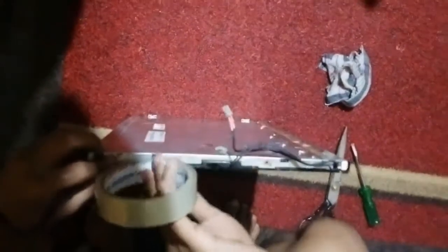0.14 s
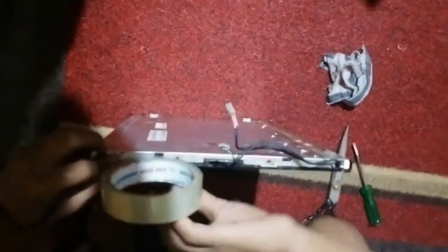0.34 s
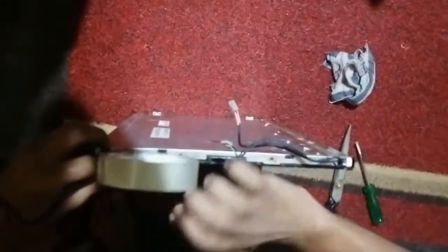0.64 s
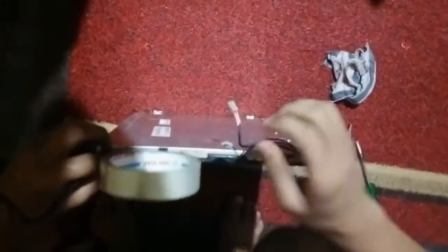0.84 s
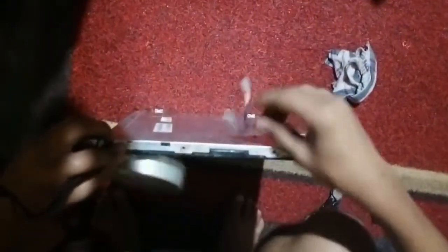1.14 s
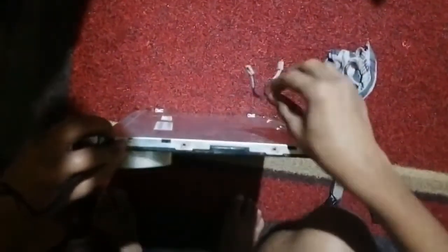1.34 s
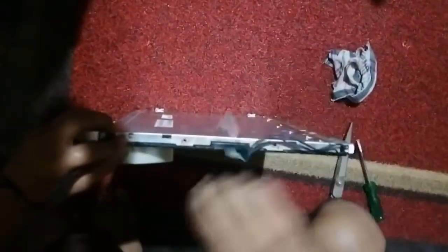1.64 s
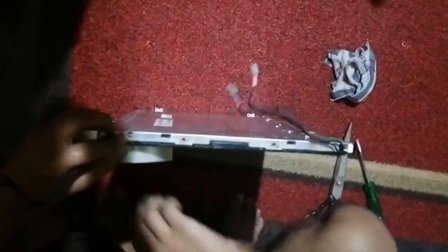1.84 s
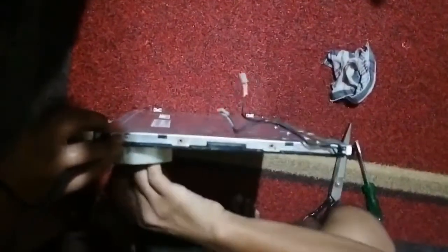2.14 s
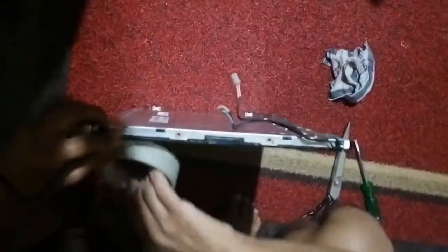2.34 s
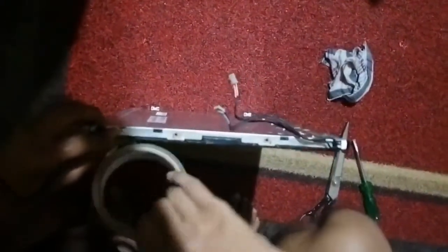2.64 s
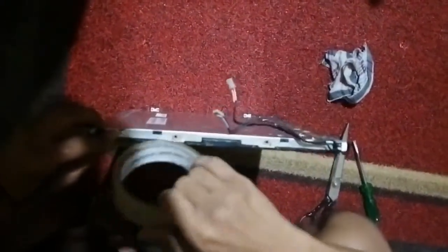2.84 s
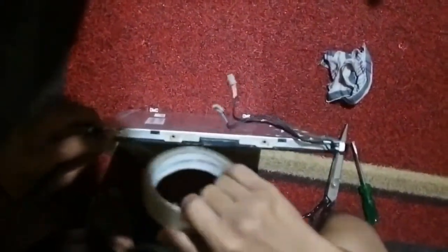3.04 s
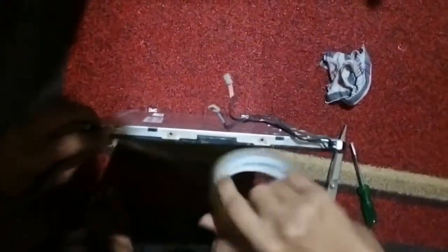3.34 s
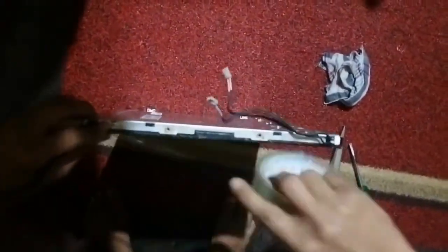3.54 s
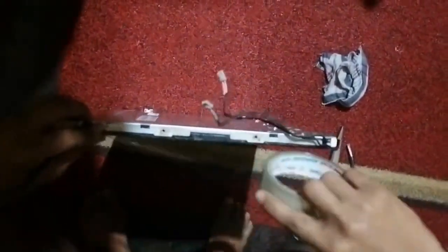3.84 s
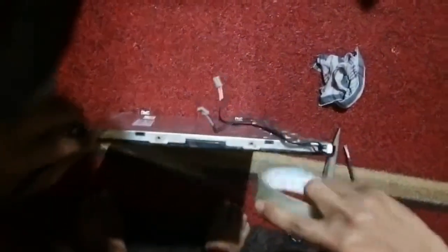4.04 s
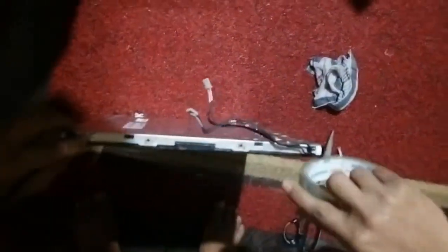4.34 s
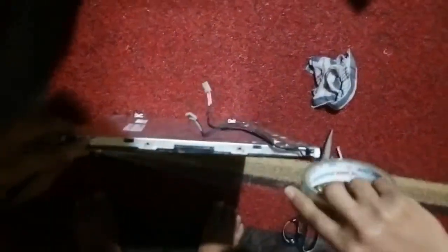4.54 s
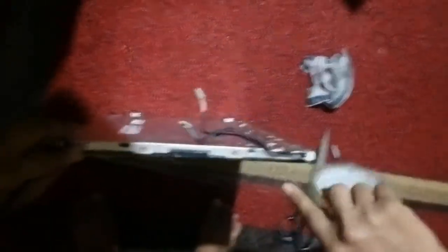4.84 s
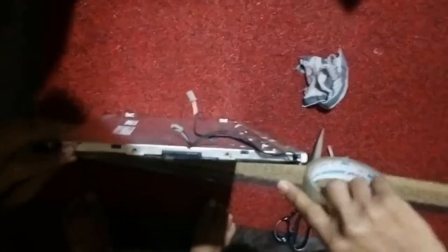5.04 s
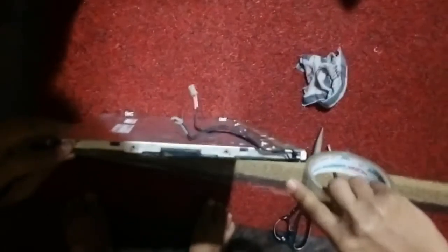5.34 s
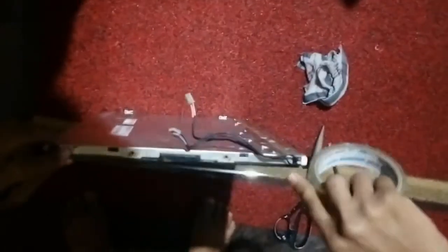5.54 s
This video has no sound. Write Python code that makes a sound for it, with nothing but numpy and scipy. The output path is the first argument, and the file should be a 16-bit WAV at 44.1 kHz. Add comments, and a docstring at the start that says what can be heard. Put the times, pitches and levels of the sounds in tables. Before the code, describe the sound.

Fingers pick at and crinkle a roll of adhesive tape, then pull it out in short rasps along a faintly ringing metal panel.

```python
"""A dull pop sounds over faint hiss in a small room; fingers crinkle a roll of adhesive tape and pick
at its end, then pull it along the metal edge of a panel in short rasps. Each rasp is stick-slip
friction: at every jerk the film snaps, the glue crackles and the roll and taut strip resonate; the
panel rings on. Slower slips snap higher and louder; as the free strip grows, its hum sinks and fades."""
import sys
import numpy as np
from scipy import signal
from scipy.fft import rfft, irfft
from scipy.io import wavfile
from scipy.ndimage import map_coordinates

SR = 44100
rng = np.random.default_rng(int(sys.argv[2]) if len(sys.argv) > 2 else 0)


def bounce(signal):
    """Save signal as a 16-bit WAV file at the path given by the first command-line argument."""
    frames = np.transpose(np.atleast_2d(signal))
    limited = np.clip(frames, -1, 1)
    pcm = np.round(limited * 32767).astype(np.int16)
    wavfile.write(sys.argv[1], SR, pcm)


N = 251370

# Runs of stick-slip:
# first_slip_s, last_slip_s, start_rate_hz, end_rate_hz, snap_db, glue_db, free_strip_m, panel_db
PULLS = [(3.4895, 3.5685, 314, 160.5, -1, -18, 0.19, -21), (3.6308, 3.6919, 295, 293, -2, -18.5, .27, -20),
         (3.8086, 3.8223, 195, 208, 2.5, -16.5, .29, -13.5), (4.2107, 4.301, 126, 200, 1.5, -17, .35, -25),
         (4.3139, 4.3360, 135, 133, 1, -23, 0.41, -20.5), (4.9532, 4.9914, 53.2, 44.7, -3, -18, 0.34, -33)]
USUAL_RATE_HZ, SHORT_STRIP_M = 200, 0.17  # reference slip rate and free length


def amp(db):
    """Decibels to amplitude ratio."""
    return 10 ** (np.asarray(db) / 20)


def unit(x):
    """Normalisation to rms 1."""
    return x / np.sqrt(np.mean(x ** 2) + 1e-20)


def along(points, hz):
    """Interpolation of (frequency_hz, value) points on a logarithmic frequency axis."""
    frequencies, values = np.transpose(points)
    return np.interp(np.log(hz + 1e-6), np.log(frequencies), values)


def seconds(size):
    """Sample times."""
    return np.arange(size) / SR


def add(track, start_s, x):
    """Superposition of x on the track."""
    i = max(round(start_s * SR), 0)
    track[i:i + len(x)] += x[:len(track) - i]


def through(x, response):
    """Linear filtering by convolution with an impulse response."""
    return signal.fftconvolve(x, response)[:len(x)]


def impulse(db_of_hz, size=2048):
    """The minimum-phase impulse response of a spectrum, with energy 1."""
    cepstrum = irfft(np.log(amp(db_of_hz(np.fft.rfftfreq(size, 1 / SR))) + 1e-6))
    cepstrum[1:size // 2] *= 2
    cepstrum[size // 2 + 1:] = 0
    response = irfft(np.exp(rfft(cepstrum)))
    return response / np.linalg.norm(response)


def resonance(hz, centre_hz, q):
    """Gain in dB of a second-order resonator."""
    return -10 * np.log10(1 + (q * (hz / centre_hz - centre_hz / (hz + 1e-6))) ** 2)


def grit(size, spread_db):
    """Fracture noise of rms 1: tiny impulses with a log-normal spread of size."""
    return unit(rng.standard_normal(size) * amp(spread_db * rng.standard_normal(size)))


def hiss(spectrum):
    """Stationary noise of rms 1 with the given spectral shape."""
    gain = amp(along(spectrum, np.fft.rfftfreq(N, 1 / SR)))
    return unit(irfft(rfft(rng.standard_normal(N)) * gain, N))


def background(settle_s=0.7):
    """The noise floor of room and microphone: its colour drifts at first, its level sinks late on."""
    # Spectra of the low hiss and of the early and settled treble: frequency_hz, density_db
    low_spectrum = [(12, -68), (20, -29.5), (27, -33.5), (40, -11.5), (52, -1.5), (96, -9), (123, -4),
                    (319, -5), (369, -5), (582, -3.5), (1850, -4), (2800, -4.5), (3640, -33), (6160, -120)]
    early_spectrum = [(1760, -40), (3000, -17), (3450, 0), (3550, -19), (4030, 0), (4440, 1), (6350, -19),
                      (7200, -13), (8230, -26.5), (14100, -29), (16000, -43)]
    settled_spectrum = [(1760, -43), (3000, -3), (3310, 6.5), (3480, -4), (3570, -3), (4050, 4.5),
                        (5520, -8.5), (6170, -19), (7350, 0), (7670, -9.5), (8170, -19.5), (9460, -17),
                        (10700, -20.5), (15100, -28), (16000, -42)]
    # Drift of the noise floor: time_s, gain_db
    drift = [(0, -2.5), (3.3, 1), (5.7, -8)]
    gain = amp(np.interp(seconds(N), *np.transpose(drift)))
    settled = np.clip(seconds(N) / settle_s, 0, 1) ** 2
    sizzle = np.sqrt(1 - settled) * hiss(early_spectrum) + np.sqrt(settled) * hiss(settled_spectrum)
    return gain * (amp(-63.5) * hiss(low_spectrum) + amp(-61) * sizzle)


def room(x, build_s=0.00033, gap_s=0.00067, hold_s=0.02, echo_s=0.0251, echo_width_s=0.0025):
    """Reverberation: dense reflections hold for one crossing, swell with the far wall's echo and die."""
    # Reverberation time: frequency_hz, t60_s
    decay_times = [(120, 0.49), (500, 0.27), (1500, 0.25), (3000, 0.25), (7000, 0.24), (14000, 0.18)]
    # Colour of the reflections: frequency_hz, gain_db
    colour = [(60, -23.5), (160, -2), (260, 2), (400, 2.5), (600, 0.5), (740, -2), (1000, -3.5),
              (2000, 3.5), (3200, 5.5), (4300, -3), (7500, 6.5), (14000, 0.5)]
    hz, frame_s, noise = signal.stft(rng.standard_normal(32768), SR, nperseg=256)
    decay = amp(-60 * np.maximum(frame_s - hold_s, 0) / along(decay_times, hz)[:, None])
    tail = signal.istft(noise * decay, SR, nperseg=256)[1]
    t = seconds(len(tail))
    tail *= 1 - np.exp(-np.maximum(t - gap_s, 0) / build_s)
    tail *= 1 + amp(-0.5) * np.exp(-((t - echo_s) / echo_width_s) ** 2)
    tail = through(tail, impulse(lambda hz: along(colour, hz)))
    return through(x, tail / np.linalg.norm(tail))


def pop(time_s=.2247, swell_s=0.022):
    """A brief faint swell of noise leads into a dull, dry pop: a filtered impulse with little treble."""
    # Spectrum of the pop: frequency_hz, gain_db
    spectrum = [(200, -34), (500, -25.5), (900, -17.5), (1900, -20.0), (2800, -36.5), (6000, -58)]
    out = np.zeros(N)
    rise = np.linspace(.2, 1, round(swell_s * SR))
    add(out, time_s - swell_s, amp(-47) * rise * rng.standard_normal(len(rise)))
    add(out, time_s, amp([-16.5]))
    return through(out, impulse(lambda hz: along(spectrum, hz)))


def bumps():
    """Soft handling excites low, damped resonances with swells of noise."""
    # Knocks and creaks: start_s, length_s, level_db, pitch_hz
    knocks = [(1.364, 0.034, -54.5, 264), (1.374, 0.022, -48, 770), (3.9, 0.16, -57, 302.7),
              (5.326, 0.079, -65, 179.8)]
    out = np.zeros(N)
    for start_s, length_s, level_db, pitch_hz in knocks:
        swell = np.hanning(round(length_s * SR))
        body = impulse(lambda hz: 2 * resonance(hz, pitch_hz, q=3))
        add(out, start_s, amp(level_db) * signal.fftconvolve(swell * rng.standard_normal(len(swell)), body))
    return out


def fidgets(rate_hz=7, length_s=0.039, pitch_hz=3600):
    """Fingers rustle the film at jittered intervals; returns rows for crinkles()."""
    # Spells of shifting the grip: start_s, end_s, level_db
    spells = [(2.333, 2.703, -60.5), (3.3, 3.467, -64), (4.619, 5.302, -65)]
    rows = []
    for start_s, end_s, level_db in spells:
        count = max(round((end_s - start_s) * rate_hz), 1)
        for k, (jitter, size, colour) in enumerate(2 * rng.random((count, 3)) - 1):
            onset_s = start_s + (end_s - start_s) * (k + (1 + jitter) / 4) / count
            rows.append((onset_s, length_s, level_db + 2 * size, pitch_hz * 2 ** (colour / 2)))
    return rows


def crinkles(grains_per_s=300, grain_decay=2.4):
    """Sticky film lifts and creases, releasing energy in clumps of unevenly spaced transients."""
    # Creases of the film: start_s, length_s, level_db, pitch_hz
    creases = [(1.2, 0.044, -54, 1900), (1.281, 0.016, -41, 3500), (1.297, 0.018, -27.5, 3780),
               (1.323, 0.03, -44.5, 2700), (2.149, 0.042, -49.5, 5300), (2.519, 0.016, -48, 2820),
               (2.699, 0.021, -49.5, 2650), (5.509, 0.047, -63, 3990)]
    # Radiation of the film: frequency_hz, gain_db
    spectrum = [(200, 7), (1000, 6), (3500, 6), (6300, 6.5), (7600, 5), (8300, -3), (12000, 9.5),
                (16000, -8.5)]
    out = np.zeros(N)
    for start_s, length_s, level_db, pitch_hz in creases + fidgets():
        t = seconds(round(length_s * SR))
        grain_times = np.cumsum(rng.uniform(.3, 1.7, 64)) / grains_per_s
        grain_phase = np.mod(np.interp(t, grain_times, np.arange(len(grain_times))), 1)
        swell = np.sin(np.pi * (t + .003) / (length_s + .006))
        clump = unit(grit(len(t), spread_db=0) * np.exp(-grain_decay * grain_phase) * swell)
        film = impulse(lambda hz: along(spectrum, hz) + resonance(hz, pitch_hz, q=1.51))
        add(out, start_s, amp(level_db) * signal.fftconvolve(clump, film))
    return out


def ticks(t60_s=.011):
    """Impulsive excitation: a nail catches the tape's edge, and a broad resonance colours the burst."""
    # Catches of the nail: start_s, level_db, pitch_hz
    catches = [(0.317, -53, 4400), (1.176, -28.5, 3100), (1.816, -41.5, 5100), (2.143, -46, 5160),
               (2.436, -41, 3270), (2.521, -51, 3300), (2.633, -38.5, 6560), (2.771, -34, 3300),
               (2.917, -41.5, 3000), (2.977, -23.5, 1920), (3.134, -45, 3580), (3.284, -32.5, 1330),
               (3.37, -37.5, 2230)]
    # Spectrum of the contact: frequency_hz, gain_db
    spectrum = [(150, -18), (800, -1.5), (1800, -1), (3200, -1.5), (7000, 0.5), (12000, -0.5),
                (16000, -11.5)]
    out, t = np.zeros(N), seconds(2048)
    for start_s, level_db, pitch_hz in catches:
        contact = impulse(lambda hz: along(spectrum, hz) + resonance(hz, pitch_hz, q=1.2))
        burst = through(grit(len(t), spread_db=8.5) * amp(-60 * t / t60_s), contact)
        add(out, start_s, amp(level_db + 16.5) * burst / np.linalg.norm(burst))
    return out


def roll(jerks):
    """Damped modes make the cardboard roll sound hollow; the wider a mode, the faster it decays."""
    # Modes of the roll: frequency_hz, bandwidth_hz, level_db
    modes = [(600, 300, 6), (1082, 55, -1.5), (1432, 33, -0.5), (1880, 430, -1), (3200, 31, -19),
             (3580, 37, -3), (3910, 360, 5.5)]
    t = seconds(8192)
    ring = sum(amp(db) * np.sqrt(width) * np.exp(-np.pi * width * t) * np.sin(2 * np.pi * hz * t)
               for hz, width, db in modes)
    return through(jerks, ring / np.linalg.norm(ring))


def panel(pitch_hz, t60_s=1.9):
    """Free vibration of thin metal after a tug: a few clear modes among many close ones, energy 1."""
    # Clear modes of the panel: frequency_hz, level_db
    modes = [(872.1, -71.5), (1157, -75), (1340, -82.5), (1556, -78), (1685, -77), (1739, -93),
             (2024, -72.5), (2121, -72.5), (2191, -76), (2266, -73.5), (2320, -74), (2369, -80),
             (2449, -76), (2676, -83.5), (2864, -85.5), (2982, -77.5), (3074, -87.5), (3160, -78)]
    # Radiation of its close modes: frequency_hz, gain_db
    spectrum = [(150, -45), (500, -6.5), (850, 1.5), (2400, -2), (2750, -14.5), (3200, 0), (3600, -14),
                (6000, -20.5), (9000, -52)]
    t = seconds(65536)
    clear = unit(sum(amp(db) * np.sin(2 * np.pi * hz * t + rng.uniform(0, 2 * np.pi)) for hz, db in modes))
    wash = unit(through(rng.standard_normal(len(t)), impulse(lambda hz: along(spectrum, hz))))
    emphasis = impulse(lambda hz: resonance(hz, pitch_hz, q=.7))
    ring = through(.5 * clear + wash, emphasis) * amp(-60 * t / t60_s)
    return ring / np.linalg.norm(ring)


def strip(wave_m_per_s=107, feed_m_per_s=.6, rise_s=0.0042, t60_s=0.14, flutter_db=6.5, waver=0.094):
    """The taut strip hums as a string, f = c / 2L: lower and weaker when long, louder for fast slips."""
    out, t = np.zeros(N), seconds(16384)
    for first_s, last_s, rate_hz, *_, free_m, _ in PULLS:
        pull_s = last_s - first_s
        length_m = free_m + feed_m_per_s * np.minimum(t, pull_s)
        flutter, bend = (map_coordinates(rng.standard_normal(64), [t * 150]) for _ in range(2))
        pitch_hz = wave_m_per_s / (2 * length_m) * np.exp(waver * bend)
        level_db = -37.5 - 50 * (length_m - SHORT_STRIP_M) + 20 * np.log10(rate_hz / USUAL_RATE_HZ)
        release_db = -60 * np.maximum(t - pull_s, 0) / t60_s
        swing = (1 - np.exp(-t / rise_s)) * amp(level_db + flutter_db * flutter + release_db)
        add(out, first_s, swing * np.sin(2 * np.pi * np.cumsum(pitch_hz) / SR))
    return out


def slip_times(first_s, last_s, start_hz, end_hz):
    """Relaxation oscillation as (time_s, rate_hz) pairs; the hand holds its speed, then changes it late."""
    def period(progress):
        return 1 / start_hz + (1 / end_hz - 1 / start_hz) * progress ** 2
    count = max(round((last_s - first_s) / period(np.linspace(0, 1)).mean()), 2)
    elapsed = np.append(0, np.cumsum(period(np.linspace(0, 1, count))))
    times = first_s + (last_s - first_s) * elapsed / elapsed[-1]
    return list(zip(times, 1 / period(np.linspace(0, 1, count + 1))))


def peel(snap_hz=1482, crackle_t60_s=0.032, glue_fade_db_per_s=66.5, taut_s=0.0023, jitter_s=.00035):
    """Stick-slip friction: each release of tension snaps the film, tears glue and tugs the panel."""
    # Spectrum of a snap: pitch_ratio, gain_db
    snap_spectrum = [(.03, -43.5), (.1, -25.5), (.24, -25), (.38, -8.5), (.6, 0), (1, -0.5), (1.3, -1.5),
                     (1.7, -16.5), (3.2, -23), (4.5, -26.5), (8, -26.5), (11, -55.5)]
    # Spectrum of tearing glue threads: frequency_hz, gain_db
    glue_spectrum = [(150, -21), (800, -18), (2000, 4), (3200, 0), (4300, 0), (5400, -2), (6300, -9.5),
                     (7600, -5), (8200, -17), (10000, -15), (11800, -11), (14000, -21), (16000, -34)]
    snaps, glue, ring = np.zeros((3, N))
    t = seconds(4096)
    for first_s, last_s, start_hz, end_hz, snap_db, glue_db, free_m, panel_db in PULLS:
        slips = slip_times(first_s, last_s, start_hz, end_hz)
        for slip_s, rate_hz in slips:
            tension = USUAL_RATE_HZ / rate_hz  # a longer wait builds more: a higher, louder snap
            snap = -impulse(lambda hz: along(snap_spectrum, hz / (snap_hz * tension ** 0.19)))
            tilt_db = -0.2 * np.log2(tension)  # per octave: a fast peel is brighter
            threads = impulse(lambda hz: along(glue_spectrum, hz) + tilt_db * np.log2(1 + hz / snap_hz))
            crackle = through(amp(-60 * t / crackle_t60_s) * grit(len(t), spread_db=4), threads)
            fade_db = glue_fade_db_per_s * (slip_s - first_s)  # glue yields more easily as the roll turns
            tautness = 1 - np.exp(-(slip_s - first_s + 1 / rate_hz) / taut_s)
            force = tautness * amp(.6 * rng.normal())
            onset_s = slip_s + rng.normal() * jitter_s
            add(snaps, onset_s, force * amp(snap_db + 3 * np.log2(tension)) * snap)
            add(glue, onset_s, force * amp(glue_db - fade_db) * crackle)
        ring_hz = 3100 * np.exp(-1.9 * (free_m - SHORT_STRIP_M))  # lower when tugged from further away
        add(ring, last_s, amp(panel_db) * np.sqrt(len(slips)) * panel(ring_hz))  # tugs add in energy
    return snaps, glue, ring


def scene():
    """Direct sound and reflections superpose; the crackle radiates widely, much of it to the walls."""
    snaps, glue, ring = peel()
    body = snaps + amp(-14.0) * roll(snaps + glue)
    hum = strip()
    picks = amp(-5) * ticks()
    nails = picks + amp(-16.0) * roll(picks)
    handling = amp(-1.5) * crinkles() + amp(-2.5) * bumps()
    walls = room(amp(-2.5) * body + amp(-1.5) * glue + amp(0.5) * hum + amp(-3) * nails + handling)
    direct = body + amp(-0.5) * glue + hum + ring + nails + handling + pop()
    return (direct + walls + background())[None]


def record(dry, low_cut_hz=75, top_hz=15850):
    """Band limiting: the small microphone loses deep bass, and the recorder cuts the highest treble."""
    thin = signal.sosfilt(signal.butter(1, low_cut_hz, "high", fs=SR, output="sos"), dry)
    passband = np.clip((top_hz - np.fft.rfftfreq(N, 1 / SR)) / 500 + .5, 0, 1)
    return irfft(rfft(thin) * passband, N)


dry = scene()
out = record(dry)
bounce(out)
```